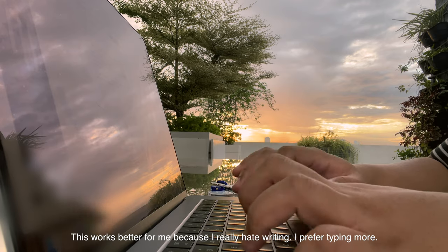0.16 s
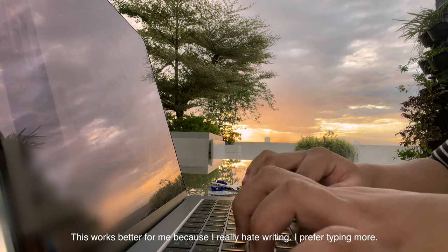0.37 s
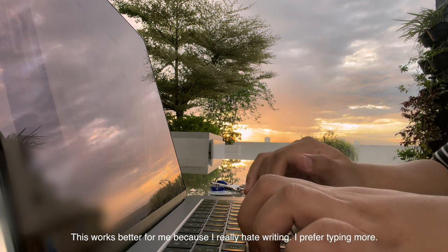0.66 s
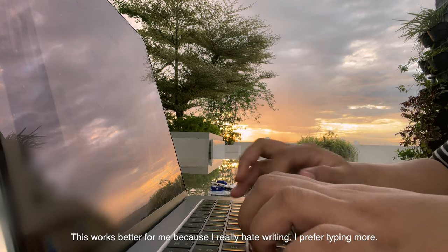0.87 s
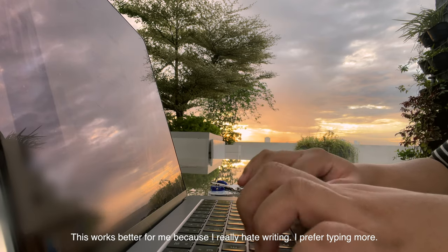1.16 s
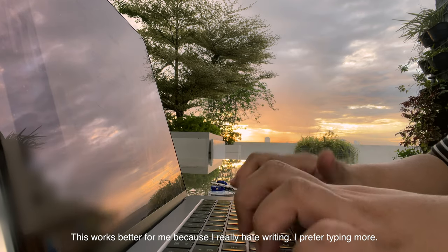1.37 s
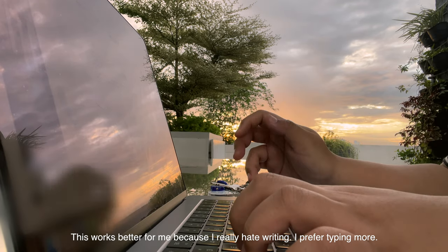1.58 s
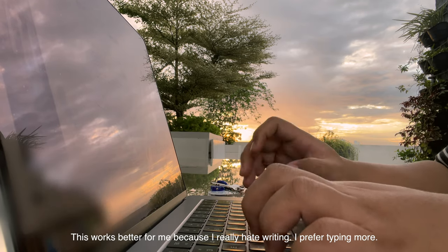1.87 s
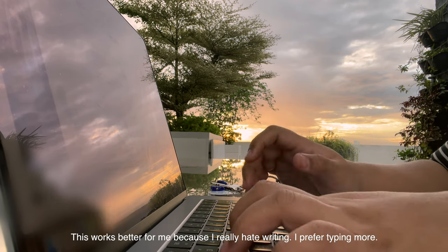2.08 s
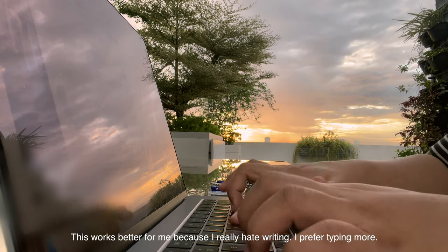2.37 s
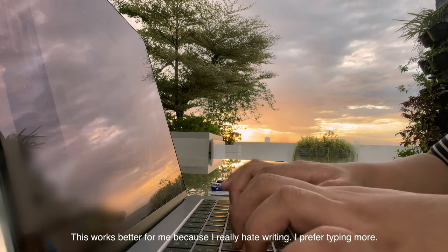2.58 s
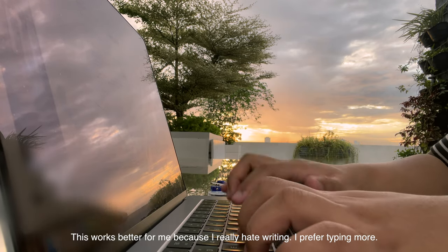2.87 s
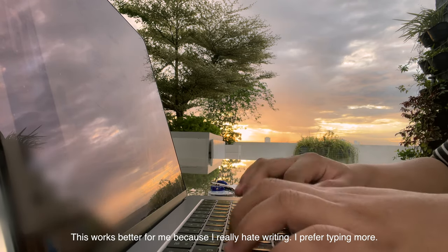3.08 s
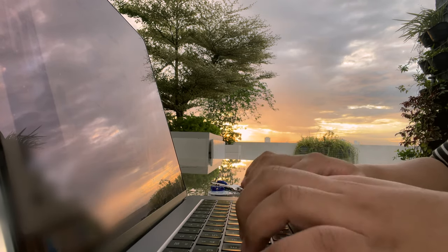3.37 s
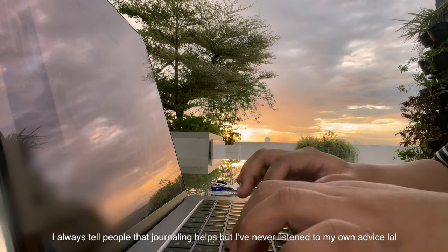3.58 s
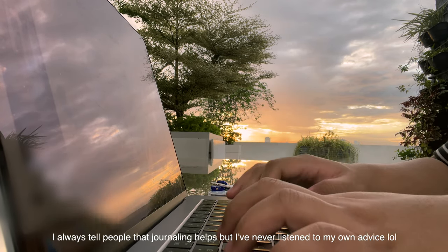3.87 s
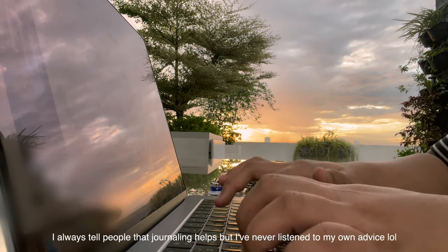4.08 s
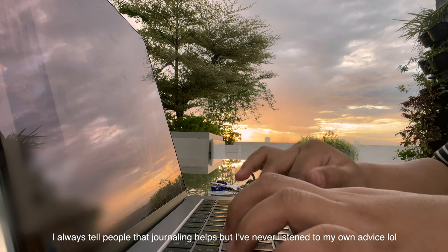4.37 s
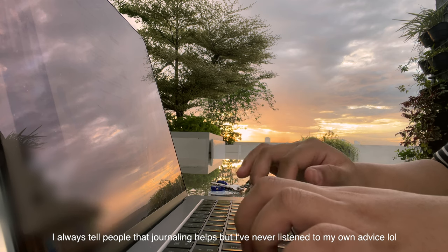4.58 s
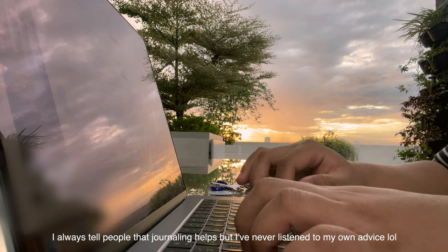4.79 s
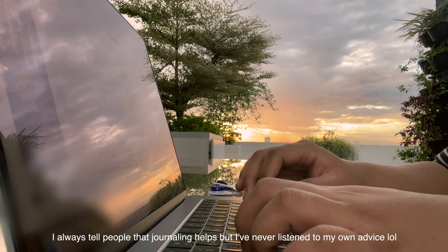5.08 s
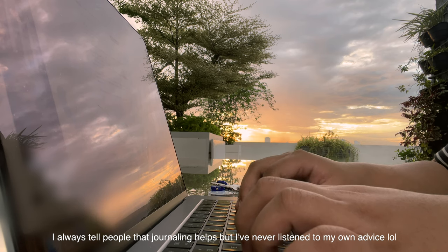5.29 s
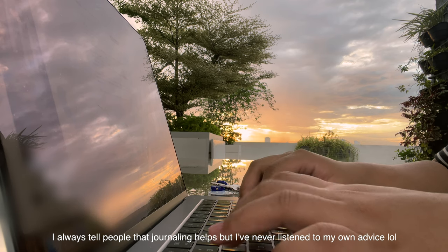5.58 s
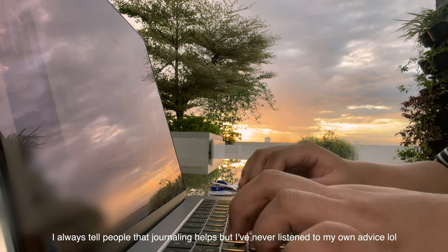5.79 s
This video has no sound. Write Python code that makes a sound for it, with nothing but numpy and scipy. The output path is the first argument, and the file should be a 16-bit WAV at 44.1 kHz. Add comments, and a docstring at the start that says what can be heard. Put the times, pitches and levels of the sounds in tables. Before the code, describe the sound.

Distant city traffic is heard from a rooftop for all six seconds: a steady low engine rumble, the loudest sound, with a softer, wide hiss of tyres. Short low hums swell out of it, mostly in the first 1.4 seconds, around 2.1, and from 5 seconds on. Close to the microphone, fingers type on a laptop from the start. Each key gives a faint, crisp plastic click with a slight scuff, rattle and soft knock of the case, and skin brushes the keys in the faster runs. The typing is quick and uneven, with a small gap after 0.5 seconds and the sharpest stroke at 2.3. It stops at about 4.4 seconds and resumes sparsely from 5.3 to the end. Very faint high beeps and squeaks pass near 0.6, 2.2, 3 and 4.9 seconds, and one tiny far honk at about 5.5.

```python
"""On a city rooftop, distant engines make a steady rumble that rings at a few low pitches, under the
hiss of tyres. Short low hums swell out of it, and a few faint beeps and one far horn pass by.
Close to the microphone, fingers type on a laptop: each key scuffs, clicks, rattles and knocks the
case. The microphone has two openings, left and right, which hear slightly different sound."""
import sys
import numpy as np
from scipy import signal
from scipy.fft import rfft, irfft, next_fast_len
from scipy.io import wavfile
from scipy.ndimage import uniform_filter1d, map_coordinates

SR = 44100
rng = np.random.default_rng(int(sys.argv[2]) if len(sys.argv) > 2 else 0)


def transcribe(signal):
    """Save signal, clipped to [-1, 1], as a 16-bit WAV file at the path in sys.argv[1]."""
    frames = np.atleast_2d(signal).T
    limited = np.clip(frames, -1, 1)
    pcm = np.round(limited * 32767).astype(np.int16)
    wavfile.write(sys.argv[1], SR, pcm)


N = 261933

# How loud the engines and the tyres are over time: t/s, level/dB
RUMBLE_LEVEL = [(0.0, -37.5), (0.4, -35.5), (0.75, -37.5), (1.2, -36), (1.65, -37.5), (2.1, -37),
                (2.28, -39), (2.4, -38), (2.8, -37), (3.9, -37.5), (4.2, -35), (4.45, -39), (5.34, -37),
                (5.8, -37), (5.94, -38)]
HISS_LEVEL = [(0, -51), (1.3, -50.5), (3, -51), (3.5, -51.5), (4.3, -51), (4.6, -51.5), (5.2, -51.5),
              (5.55, -50.5), (5.94, -52)]
# Their tone colour, or how strong each pitch is next to the others: f/Hz, level/dB
RUMBLE_COLOUR = [(12, -57.5), (20, -23), (49, -8), (62, -4.5), (76, -1.5), (129, -5), (147, -8.5),
                 (198, -2), (333, -17.5), (450, -17), (580, -42.5), (990, -120)]
HISS_COLOUR = [(180, -23.5), (300, -11), (340, -18), (460, -1), (520, -2.5), (700, -3.5), (1150, -17.5),
               (1500, -17.5), (2300, -25.5), (2900, -25.5), (3700, -29.5), (4500, -35), (8000, -45),
               (9600, -49), (10500, -64), (11200, -74), (12300, -74), (12800, -86.5)]
# Narrow peaks and dips in the city noise, up to a thin whine near 12 kHz: f/Hz, width/Hz, boost/dB
NARROW_PEAKS = [(59, 5.9, 1.5), (80.7, 3, 3.5), (119.3, 15, 4.5), (213.3, 10, -3.5), (2132, 69, 6),
                (2357, 190, 5), (2833, 76, 4.5), (11800, 150, 9), (12150, 150, 9)]
# How alike left and right are in the traffic: f/Hz, likeness (1 = same, -1 = opposite)
LIKENESS = [(60, .95), (170, .88), (260, .73), (345, .35), (470, .0), (600, -.33), (870, -.4), (1200, -.7),
            (1500, -.5), (1750, -.35), (2000, -.22), (2200, .3), (2450, .6), (2950, .42), (3250, -.12),
            (3800, -.25), (4500, .25), (5600, .0), (7700, .8), (9400, -.1), (10500, -.85)]
# How much louder the city is on the left: f/Hz, level/dB
CITY_BALANCE = [(60, 2.5), (180, 0.5), (550, 3.5), (1700, -1.5), (2400, -1), (2850, 0.4), (4500, -2),
                (6000, -1.5), (15000, 3)]
# How far the left wave runs ahead of the right, for the city and for the keys: f/Hz, lead/rad
CITY_LEAD = [(120, .02), (260, .25), (430, 0.0), (600, -.6), (900, 0.0), (1200, .1), (1500, .1), (1900, .8),
             (2300, -.2), (2800, .4), (3200, 0.0)]
KEY_LEAD = [(2000, -6.9), (4500, -5.6), (5000, -4.3), (5500, -2.5), (6000, -.5), (6500, 0.0), (7400, 0.0),
            (8600, -1.1), (11200, -3.1), (12200, -3.3), (13500, -4.5), (15500, -6.2)]
# Key contacts: t/s, level/dB, ring f/Hz, clack/dB, sparkle/dB, length/s
# Clack (4-6 kHz) and sparkle (above 12 kHz) are counted from the click's level (6-11 kHz).
KEY_CONTACTS = [(0.022, -74.5, 7040, -0.5, -11, 0.042), (0.036, -75, 8230, -8, -5.5, 0.02),
                (0.053, -72, 8440, -3, -8.5, 0.028), (0.066, -76, 7540, -2, -10, 0.041),
                (0.077, -75, 5020, 3, -8, 0.054), (0.094, -56.5, 7470, -6.5, -8.5, 0.028),
                (0.101, -68, 7300, -3, -12, 0.019), (0.22, -69.5, 7020, -6, -5.5, 0.03),
                (0.233, -74.5, 5640, -5, -4.5, 0.07), (0.27, -71.5, 6870, -1, -10, 0.084),
                (0.287, -63, 6450, -10, -8, 0.023), (0.305, -68.5, 9650, -7, -7.5, 0.039),
                (0.314, -68.5, 10140, -3, 1.5, 0.014), (0.342, -67.5, 5600, 5, -9.5, 0.02),
                (0.382, -67.5, 7800, -7, -13, 0.019), (0.396, -61.5, 7800, -12, -11, 0.013),
                (0.425, -74, 6910, -4, -5, 0.07), (0.453, -67.5, 6740, -8, -9, 0.023),
                (0.511, -59.5, 10120, -12, -3, 0.021), (0.517, -64.5, 8750, -8, -1.5, 0.008),
                (0.867, -70.5, 7260, -2, -3, 0.09), (0.927, -68.5, 7950, -5, -8.5, 0.048),
                (0.943, -63, 7320, -11, -4.5, 0.023), (0.96, -70.5, 9630, -6, -9, 0.062),
                (0.982, -74, 8850, -8, -11.5, 0.067), (1.041, -70, 7710, -11, -10, 0.03),
                (1.109, -84, 7060, -6, -16, 0.031), (1.11, -63, 7730, -16, -19, 0.0041),
                (1.124, -81.5, 7710, -3, -13.5, 0.036), (1.141, -78, 5580, -3, -2, 0.028),
                (1.182, -69, 7410, -9, -15, 0.025), (1.2, -71, 6440, -8, -12, 0.088),
                (1.23, -60.5, 10310, -11, -16, 0.012), (1.256, -63.5, 9470, -12, -7, 0.052),
                (1.269, -65, 8790, -7, -2.5, 0.036), (1.291, -68.5, 7170, -6, -8, 0.052),
                (1.337, -70.5, 8570, -10, 0, 0.016), (1.361, -64, 7320, 2, -6.5, 0.025),
                (1.408, -66.5, 6570, -8, -10.5, 0.028), (1.456, -68, 9240, -3, -10.5, 0.023),
                (1.482, -76, 5660, -9, -2.5, 0.07), (1.5, -68.5, 6740, -11, -5.5, 0.028),
                (1.737, -70, 6680, -6, -0.5, 0.039), (1.743, -65, 8650, -6, -4, 0.06),
                (1.947, -70.5, 8530, 1.5, -5, 0.13), (1.963, -61.5, 8030, -6, -10.5, 0.035),
                (2.052, -69.5, 8510, -2, -7, 0.035), (2.06, -63.5, 7920, -13, -7.5, 0.019),
                (2.153, -76, 5170, 0, -8.5, 0.064), (2.211, -66.5, 6630, -7, -7.5, 0.014),
                (2.304, -49, 7900, -7, -12.5, 0.025), (2.326, -79, 7040, 7, -6, 0.045),
                (2.337, -69.5, 8440, -2, -3.5, 0.037), (2.376, -74, 7450, -4, -8.5, 0.033),
                (2.395, -70, 5170, 5, -4.5, 0.042), (2.424, -70.5, 7080, -6, 1, 0.021),
                (2.452, -72.5, 6440, -7, -3, 0.023), (2.553, -66, 7150, 2, -11, 0.022),
                (2.558, -58, 7100, -3.5, -10, 0.02), (2.576, -66.5, 7940, -8, -5.5, 0.037),
                (2.595, -62.5, 5680, -5, -1, 0.023), (2.639, -70.5, 6140, -4, -5, 0.027),
                (2.681, -76.5, 8550, -4, -2, 0.031), (2.732, -58, 6940, -12, -10.5, 0.024),
                (2.738, -57, 9580, -6, -9.5, 0.019), (2.769, -63.5, 6910, -8, -3, 0.024),
                (2.774, -63, 5080, -2, -2, 0.019), (2.818, -73.5, 6200, -8, -8.5, 0.024),
                (2.932, -69.5, 8050, -6, -4, 0.029), (2.947, -67, 10160, -3, 0.5, 0.029),
                (3.054, -68.5, 6550, -2, -14, 0.06), (3.082, -64.5, 6850, -13, -4, 0.016),
                (3.108, -62, 6120, 1, -8, 0.022), (3.115, -56.5, 6160, -6, -10, 0.021),
                (3.13, -67.5, 7410, -9, -9, 0.061), (3.161, -69, 8440, -10, -8.5, 0.026),
                (3.187, -70, 8590, -2, -6.5, 0.031), (3.215, -62.5, 10120, -6, 0, 0.016),
                (3.234, -69, 5490, 1, 2, 0.027), (3.338, -76, 7900, 2, -5, 0.11),
                (3.369, -74.5, 9540, -6, 0, 0.069), (3.413, -69.5, 6650, -4, -7, 0.029),
                (3.433, -75, 7520, -3, -11, 0.1), (3.466, -73, 7450, -3, -10, 0.045),
                (3.597, -71, 9450, -11, -1.5, 0.021), (3.622, -70.5, 8290, -5, -5.5, 0.025),
                (3.65, -67.5, 6740, -7, -7.5, 0.037), (3.684, -60.5, 7020, -4, -2.5, 0.016),
                (3.723, -56, 6330, -6.5, -15.5, 0.032), (3.735, -68, 7000, -8, -8, 0.02),
                (3.74, -58, 6500, -6, -12.5, 0.0083), (3.752, -72.5, 7500, -6, -12, 0.07),
                (3.843, -69.5, 10100, -2, -6, 0.068), (3.855, -58.5, 10230, -11, -9.5, 0.015),
                (3.869, -65, 8720, -5, -2.5, 0.03), (3.9, -66, 8510, -4, -7, 0.033),
                (3.963, -73, 7920, -9, -12, 0.077), (3.982, -70, 7770, -4, -9, 0.068),
                (3.999, -67, 9260, -6, -8, 0.022), (4.015, -56.5, 7600, -7, -13, 0.011),
                (4.074, -66, 6960, -2, -4.5, 0.038), (4.172, -67.5, 6860, -5, -6, 0.035),
                (4.206, -75.5, 6570, 1, -7, 0.07), (4.22, -68.5, 6700, -6, -5, 0.023),
                (4.275, -63, 9300, -10, -10.5, 0.037), (4.293, -68.5, 6800, -5, -3.5, 0.081),
                (4.364, -77.5, 5020, 8, 0, 0.026), (4.4, -79, 6590, 0, -7, 0.038),
                (4.412, -65.5, 9540, -6, -14, 0.019), (4.417, -60.5, 7970, -4, -9.5, 0.022),
                (5.312, -80, 8400, 2, -10, 0.038), (5.567, -71, 6680, 5, -0.5, 0.023),
                (5.645, -63.5, 6960, -14, -16, 0.015), (5.677, -76, 6290, 5, -4.5, 0.064),
                (5.695, -60.5, 6590, -12, -5.5, 0.015), (5.778, -76.5, 7640, -5, -3.5, 0.052),
                (5.81, -72, 9730, -9, 0, 0.021), (5.842, -67.5, 10300, -3, -12.5, 0.044),
                (5.925, -67, 7620, -8, -12, 0.039)]
# Tone colour of a plastic key cap: f/Hz, level/dB
CAP_COLOUR = [(1500, -26), (3000, -7), (4500, -10), (5500, -6.5), (7400, -4), (8200, -5), (9900, -5),
              (11400, -17), (12400, -17.5), (13200, -10), (14300, -12.5), (15800, -18.5)]
# Pitches where the laptop case rings: f/Hz, width/Hz, level/dB
CASE_RINGS = [(820, 200, 3), (1150, 250, -3), (1480, 100, 4), (2400, 500, -2)]
# Skin brushing the keys in fast typing: start t/s, end t/s, treble level/dB
BRUSH_RUNS = [(0.0, 0.324, -91.5), (1.105, 1.38, -91.5), (2.3, 2.46, -102), (2.5, 3.25, -94),
              (3.3, 3.496, -91), (3.8, 4.35, -91.5), (5.7, 5.94, -102)]
# Low hums: t/s, length/s, f/Hz, level/dB
LOW_HUMS = [(.07, 0.044, 79, -32), (.15, 0.046, 81.8, -31), (.23, 0.11, 59, -34), (.35, .09, 78.2, -27),
            (.36, 0.1, 64.7, -37.5), (.46, 0.07, 116.6, -27.5), (.55, 0.068, 114.6, -36),
            (.97, 0.147, 67.9, -36.5), (.98, 0.097, 120.1, -37.5), (1.01, .07, 171, -37.5),
            (1.19, .16, 63.1, -31.5), (1.35, 0.032, 121, -32), (2.07, 0.0994, 118.7, -30.5),
            (2.13, 0.039, 60, -40), (5.04, 0.101, 122.3, -33), (5.34, 0.073, 83, -32),
            (5.45, 0.117, 80.8, -26), (5.5, .11, 195.1, -38.5), (5.6, 0.1594, 82.7, -27.5),
            (5.72, 0.1, 63.9, -31), (5.78, 0.044, 81.8, -27.5)]
# Faint beeps and squeaks: t/s, length/s, f/Hz, level/dB, left lead/rad
FAINT_BEEPS = [(.62, .05, 4400, -76, .5), (2.222, .016, 1750, -66, 1.0), (2.248, .018, 1750, -62, 1.0),
               (2.279, .022, 1750, -61, 1.0), (3.014, .022, 7600, -79, 0.0), (3.04, .04, 7500, -77, 0.0),
               (4.868, .04, 3520, -71, 2.0), (4.908, .04, 3530, -69, 2.0), (4.875, .035, 4340, -79, .8),
               (4.918, .032, 4340, -79, .8)]
# The tones that make up the horn: f/Hz, level/dB
HORN_TONES = [(680, -54), (1360, -64), (1720, -69), (2040, -61), (2620, -69), (3500, -71), (4400, -78)]

USUAL_KEY_DB = -62.5  # a stroke of normal strength
SCUFF_DB, KNOCK_DB = -18, 34.5  # compared with the click of a normal stroke
SCUFF_GROWS, KNOCK_GROWS = -0.74, 0.39  # change in those two per dB of a harder stroke
SCUFF_RISE_S, RATTLE_FALL_S = .045, .14  # time to rise or fall by 60 dB
RISE_SHARE, EARLY_SHARE = 0.076, .45  # the click's rise as part of its length; part of it before t = 0
SNAP_DB, SNAP_LENGTH_S = 9.5, 0.015  # snap over the click, for a contact of this length
RING_WIDTH_HZ, RING_DB, SPARKLE_DB = 800, 8, -2  # each key's main ring; a trim on every sparkle
BRUSH_FADE_DB_PER_S, BRUSH_REST_DB = 117.5, -112


def traffic():
    """Far engines rumble and tyres hiss, each drifting a little in loudness."""
    peaks_db = lambda hz: sum(bump(hz, *ring) for ring in NARROW_PEAKS)
    rumble = far_noise(lambda hz: at_pitch(RUMBLE_COLOUR, hz) + peaks_db(hz), patchy_db=0.64)
    hiss = far_noise(lambda hz: at_pitch(HISS_COLOUR, hz) + peaks_db(hz), patchy_db=1.41)
    rumble_db = over_time(RUMBLE_LEVEL) + .5 * wobble(5)
    hiss_db = over_time(HISS_LEVEL) + .3 * wobble(6)
    return amp(rumble_db) * rumble + amp(hiss_db) * hiss


def key_clicks():
    """A finger scuffs onto the cap, the key clicks home, and the loose cap rattles."""
    early = SR // 50  # samples before the contact
    t = np.arange(-early, 4 * early) / SR
    hz = np.fft.rfftfreq(len(t), 1 / SR)
    out = np.zeros((2, N + SR))
    for start, db, ring_hz, clack_db, sparkle_db, length in KEY_CONTACTS:
        noise = unit(rng.standard_normal(len(t)) + 0.55 * rng.standard_normal((2, len(t))))
        chatter = amp(26 * smooth_noise(len(t), 40))
        scuff = amp(SCUFF_DB + SCUFF_GROWS * (db - USUAL_KEY_DB) + 60 * t / SCUFF_RISE_S)
        rattle = amp(-17 - 60 * t / RATTLE_FALL_S)
        rise = np.maximum(t / (RISE_SHARE * np.clip(length, .005, .1)) + EARLY_SHARE, 0)
        click = (rise * np.exp(1 - rise)) ** 2.33  # a higher power makes a sharper peak
        stroke = (np.where(t < 0, scuff, rattle) * chatter + click) * noise
        # the rubber dome under the key buckles: short contacts snap most
        stroke[:, early + SR // 1000] += amp(SNAP_DB) * SNAP_LENGTH_S / length
        colour = key_colour(hz, ring_hz, clack_db, sparkle_db)
        out[:, round(start * SR):][:, :len(t)] += irfft(rfft(amp(db) * stroke) * colour, len(t))
    return out[:, early:N + early]


def key_colour(hz, ring_hz, clack_db, sparkle_db):
    """Each cap rings at its own pitch and at weaker scattered ones."""
    ring = amp(bump(hz, ring_hz, RING_WIDTH_HZ, RING_DB) + 18 * smooth_noise(len(hz), 50))
    gain = amp(at_pitch(CAP_COLOUR, hz)) * ring
    strength = lambda low, high: np.sqrt(np.mean(gain ** 2 * (hz > low) * (hz < high)))
    clack = amp(clack_db) / strength(3800, 6000)
    click = 1 / strength(6000, 11000)
    sparkle = amp(sparkle_db + SPARKLE_DB) / strength(12300, 15800)
    bands = np.select([hz < 5800, hz > 12400], [clack, sparkle], click)
    return from_cap(hz) * ring * uniform_filter1d(bands, size=40)


def case_knocks():
    """Just after each click, a blow softened by the rubber dome makes the laptop case ring."""
    blows = np.zeros(N + SR)
    for start, db, *_ in KEY_CONTACTS:
        blow_db = db + KNOCK_DB + KNOCK_GROWS * (db - USUAL_KEY_DB)
        blows[round((start + .001) * SR):][:12] += amp(blow_db) * np.hanning(12) / 6
    # flipping every other sign fills the dips between the rings
    case = lambda hz: sum((-1) ** k * amp(db) * 1j * hz * width / (pitch**2 - hz**2 + 1j * hz * width)
                          for k, (pitch, width, db) in enumerate(CASE_RINGS))
    return filtered(blows[:N], case)


def skin_brushing():
    """Skin rubs over the caps during runs of fast typing, and sinks to a whisper in between."""
    t = np.arange(N) / SR
    level_db = BRUSH_REST_DB
    for start, end, db in BRUSH_RUNS:
        outside_s = np.abs(t - np.clip(t, start, end))
        level_db = np.maximum(level_db, db - BRUSH_FADE_DB_PER_S * outside_s)
    grit = amp(5 * wobble(150)) * (rng.standard_normal(N) + 0.37 * rng.standard_normal((2, N)))
    hz = np.arange(0, SR / 2, 10)
    treble = np.sqrt(np.mean(amp(at_pitch(CAP_COLOUR, hz)) ** 2 * (hz > 12800)))
    return filtered(amp(level_db) * unit(grit), from_cap) / treble


def hums():
    """Short low notes swell out of the rumble."""
    return tones(LOW_HUMS, fade_share=0.375, rough_db=1)


def far_horn(start_s=5.551, length_s=.02, lead_rad=1.0):
    """One very short honk: several tones sounding together."""
    rows = [(start_s, length_s, hz, db, lead_rad) for hz, db in HORN_TONES]
    return tones(rows, fade_share=.7, rough_db=3)


def beeps():
    """Faint high beeps and squeaks come from the streets."""
    return tones(FAINT_BEEPS, fade_share=.7, rough_db=3)


def tones(rows, fade_share, rough_db):
    """Pure tones that flicker in loudness and fade in and out over a share of their length."""
    out = np.zeros((2, N + SR))
    for start, length, hz, db, *lead in rows:
        t = np.arange(int(length * (1 + fade_share) * SR)) / SR
        shape = signal.windows.tukey(len(t), 2 * fade_share / (1 + fade_share))
        phase = 2 * np.pi * (hz * t + rng.random()) + np.array([[.5], [-.5]]) * sum(lead)
        first = max(round((start - length * fade_share / 2) * SR), 0)
        out[:, first:][:, :len(t)] += amp(db) * shape * np.sin(phase)
    return filtered(out[:, :N] * amp(rough_db * wobble(82)), from_city)


def far_noise(colour_db, patchy_db):
    """Patchy noise from all sides, so left and right are more alike at some pitches than others."""
    grid = signal.stft(rng.standard_normal((2, N)), nperseg=512)[2]  # side, pitch, time
    patches = uniform_filter1d(rng.standard_normal(grid.shape[1:]), size=6, axis=0)
    patches = uniform_filter1d(patches, size=14, axis=1)
    pair = signal.istft(grid * amp(patchy_db * unit(patches)), nperseg=512)[1][:, :N]
    turn = lambda hz: np.arccos(at_pitch(LIKENESS, hz)) / 2
    same, apart = filtered(pair, lambda hz: amp(colour_db(hz)) * [np.cos(turn(hz)), np.sin(turn(hz))])
    return unit(filtered(np.array([same + apart, same - apart]), from_city))


def from_city(hz):
    """The streets are a little louder and earlier on one side; which side depends on the pitch."""
    return left_right(at_pitch(CITY_LEAD, hz), at_pitch(CITY_BALANCE, hz))


def from_cap(hz):
    """The tone colour of a plastic cap as it reaches the two openings."""
    return amp(at_pitch(CAP_COLOUR, hz)) * left_right(at_pitch(KEY_LEAD, hz), louder_db=.6)


def left_right(lead_rad, louder_db):
    """Split the left side's lead and extra level evenly between the two openings."""
    half = .5j * lead_rad + np.log(amp(louder_db)) / 2
    return np.exp(np.array([half, -half]))


def filtered(x, response):
    """Scale and delay each pitch in x as response(hz) says."""
    size = next_fast_len(N + SR // 2)
    return irfft(rfft(x, size) * response(np.fft.rfftfreq(size, 1 / SR)), size)[..., :N]


def bump(hz, centre_hz, width_hz, db):
    """A boost in dB around one pitch."""
    return db / (1 + (2 * (hz - centre_hz) / width_hz) ** 2)


def at_pitch(table, hz):
    """Read between the rows of a pitch table, with octaves evenly spaced."""
    pitches, values = np.transpose(table)
    return np.interp(np.log(hz + 1), np.log(pitches + 1), values)


def over_time(table):
    """Turn a time table into one value per sample."""
    return np.interp(np.arange(N) / SR, *np.transpose(table))


def wobble(per_second):
    """A smooth curve through this many random points a second."""
    points = rng.standard_normal(int(N * per_second / SR) + 4)
    return map_coordinates(points, [np.arange(N) * per_second / SR])


def smooth_noise(count, span):
    """Random numbers, each averaged over span neighbours."""
    return uniform_filter1d(rng.standard_normal(count), size=span)


def amp(db):
    """Turn decibels into a multiplier."""
    return 10 ** (np.asarray(db) / 20)


def unit(x):
    """Scale x to an average power of 1."""
    return x / np.sqrt(np.mean(x ** 2) + 1e-20)


def scene():
    """The traffic, the nearby typing and the small city sounds together."""
    return traffic() + key_clicks() + case_knocks() + skin_brushing() + hums() + far_horn() + beeps()


def record(dry):
    """The microphone keeps nothing above 15850 Hz."""
    return filtered(dry, lambda hz: hz < 15850)


dry = scene()
out = record(dry)
transcribe(out)
```